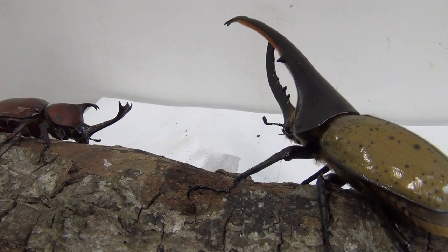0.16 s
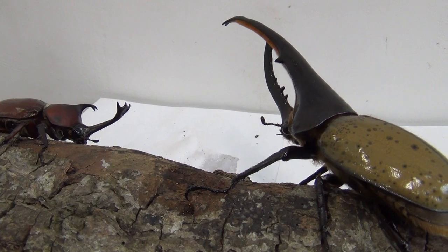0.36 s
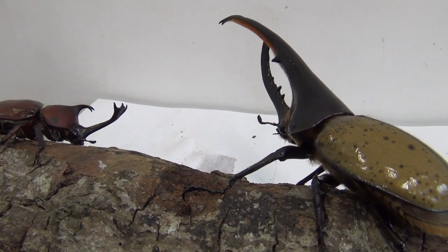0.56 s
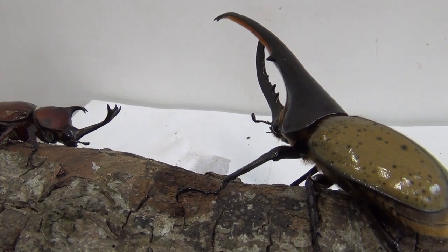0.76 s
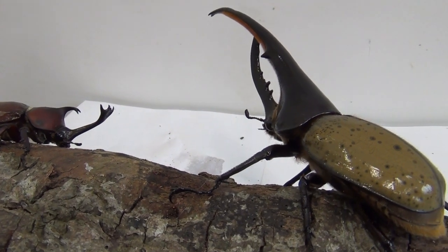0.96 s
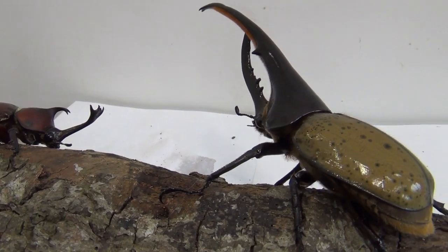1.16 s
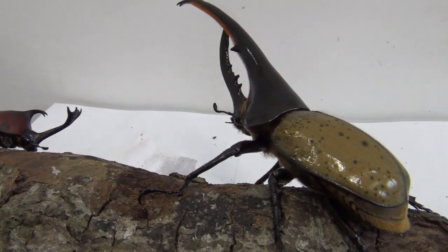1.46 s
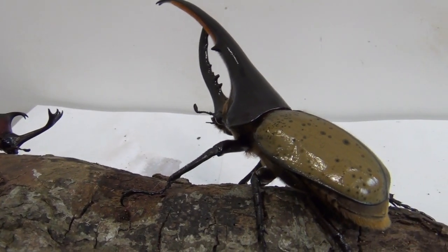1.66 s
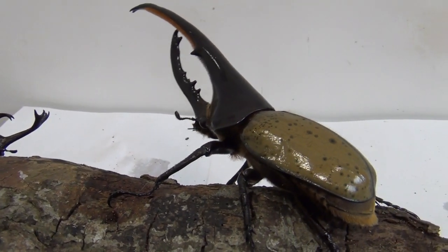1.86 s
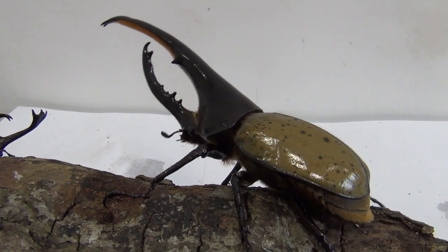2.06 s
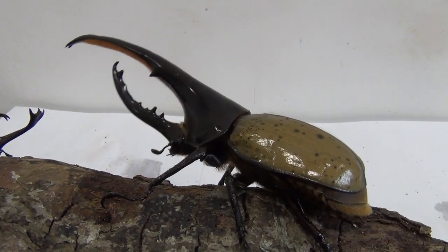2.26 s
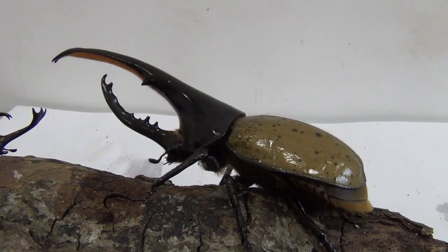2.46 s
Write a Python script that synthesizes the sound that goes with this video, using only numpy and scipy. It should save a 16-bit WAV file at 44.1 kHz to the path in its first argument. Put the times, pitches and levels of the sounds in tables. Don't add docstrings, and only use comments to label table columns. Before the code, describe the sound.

Large horned beetles creep on bark: sharp tiny clicks, woody taps and faint scrapes come in sparse clusters, the loudest before one second, close to a small stereo microphone in a quiet room with steady hiss.

```python
import sys
import numpy as np
from scipy import signal
from scipy.fft import rfft, irfft
from scipy.io import wavfile

SR = 44100
rng = np.random.default_rng(int(sys.argv[2]) if len(sys.argv) > 2 else 0)


def transcribe(u):
    v = np.clip(np.atleast_2d(u).T, -1, 1)
    q = np.round(v * 32767).astype(np.int16)
    wavfile.write(sys.argv[1], SR, q)


def gain_from_db(level_db):
    decades = np.asarray(level_db, float) / 20
    return 10 ** decades


N = 115542
TICK_SIDE_DB = -16.5


def rms_one(x):
    return x / np.sqrt(np.mean(x ** 2) + 1e-20)


def shape(x, points):
    point_hz, point_db = np.transpose(points)
    gain_db = np.interp(np.log(np.fft.rfftfreq(N, 1 / SR) + 1), np.log(point_hz), point_db)
    return irfft(rfft(x) * gain_from_db(gain_db), N)


def butter_filter(x, hz, kind):
    return signal.sosfilt(signal.butter(2, hz, kind, fs=SR, output="sos"), x)


def ring(clicks, hz, t60):
    radius = gain_from_db(-60 / (t60 * SR))
    angle = 2 * np.pi * hz / SR
    return signal.lfilter([0, np.sin(angle)], [1, -2 * radius * np.cos(angle), radius ** 2], clicks + 1e-18)


def hiss():
    # hz [Hz], density_db [dB per Hz]
    common_hiss = [(25, -62), (60, -32), (200, -15.5), (400, -7), (800, -2), (1900, -4), (10100, -14.5),
                   (15800, -20.5)]
    # hz [Hz], density_db [dB per Hz]
    side_hiss = [(25, 3), (80, 3), (900, -2), (2500, -9), (4500, -16.5), (5800, -3), (9500, -10),
                 (15000, -20)]
    # hz [Hz], left_minus_right_db [dB]
    lean = [(60, -7), (300, 2), (600, 2.5), (1100, 0.2), (8000, -0.1)]
    flicker_db, flicker_per_s = .15, 8
    fan_hz, fan_width_hz = 862, 55
    white = rng.standard_normal((4, N))

    flicker = rms_one(shape(white[3], [(flicker_per_s, 0), (10 * flicker_per_s, -40), (SR / 2, -150)]))
    mid = gain_from_db(-52 + flicker_db * flicker) * rms_one(shape(white[0], common_hiss))
    fan_t60 = np.log(1000) / (np.pi * fan_width_hz)
    mid += gain_from_db(-69) * rms_one(ring(white[2], fan_hz, fan_t60))
    side = gain_from_db(-66) * rms_one(shape(white[1], side_hiss))

    whine_hz, whine_rms_db = 15625, -82
    whine = gain_from_db(whine_rms_db) * np.sqrt(2) * np.sin(2 * np.pi * whine_hz * np.arange(N) / SR)
    left = shape(mid, [(hz, db / 2) for hz, db in lean])
    right = shape(mid, [(hz, -db / 2) for hz, db in lean])
    return np.array([left + side, right - side]) + whine


def scrapes(t):
    # start_s [s], length_s [s], level_db [dB]
    strokes = [
        (.797, .03, -57),
        (1.4, .14, -60),
        (2.015, .035, -58),
        (2.055, .03, -59),
        (2.45, .05, -60),
    ]
    grains_per_s = 4500
    grains = (rng.random(N) < grains_per_s / SR) * rng.standard_normal(N)
    grit = rms_one(butter_filter(grains + 1e-18, [3200, 12500], "band"))
    swell = np.zeros(N)
    for start_s, length_s, level_db in strokes:
        progress = np.clip((t - start_s) / length_s, 0, 1)
        swell += gain_from_db(level_db) * np.sqrt(np.abs(np.sin(np.pi * progress)))
    return swell * grit


def squeak(t):
    start_s, length_s, pitch_hz = .7992, .012, 9820
    level_db, growth_db = -50.5, 2
    progress = (t - start_s) / length_s
    gate = np.clip(14 * np.minimum(progress, 1 - progress), 0, 1)
    held = gate * gain_from_db(level_db + growth_db * np.clip(progress, 0, 1))
    return held * np.sin(2 * np.pi * pitch_hz * t)


def drags():
    t = np.arange(N) / SR
    return (scrapes(t) + squeak(t)) * [[1], [gain_from_db(TICK_SIDE_DB)]]


def ticks(events, modes, crack_top_hz, count=4):
    start_s, peak_db, region_hz, fall_db, chatter_s = np.transpose(events)[:, :, None]
    n_events = len(events)
    chatter_loss_db, after_slip_db = 4, -9
    mode_scatter_db, mode_spread_s = 1.5, .00015

    def draw_sign(columns):
        return np.sign(rng.random((n_events, columns)) - .5)

    slip = np.arange(count)
    share = (slip + rng.random((n_events, count)) * (slip > 0)) / count
    at = np.clip(((start_s + share * chatter_s) * SR).astype(int), 0, N - 1)
    size = gain_from_db(peak_db - chatter_loss_db * share + after_slip_db * (share > 0)) * draw_sign(count)
    size = size * ((share == 0) | (chatter_s > 0))

    out = np.zeros((2, N))
    for k, (mode_hz, mode_db, t60) in enumerate(modes):
        octaves_away = np.abs(np.log2(mode_hz / region_hz))
        scatter_db = 2 * mode_scatter_db * (rng.random((n_events, 1)) - 1)
        blow = size * gain_from_db(mode_db - fall_db * octaves_away + scatter_db)
        delay = (rng.random((n_events, 1)) * mode_spread_s * SR).astype(int)
        late = np.minimum(at + delay, N - 1)
        clicks = np.zeros((2, N))
        np.add.at(clicks[0], late, blow)
        np.add.at(clicks[1], late, blow * gain_from_db(TICK_SIDE_DB) * draw_sign(1))
        out += (-1) ** k * ring(clicks, mode_hz, t60)

    crack_db, crack_s = -20, .0015
    strength = np.zeros(N)
    np.add.at(strength, at, np.abs(size) * gain_from_db(crack_db))
    decay = np.exp(-1 / (crack_s * SR))
    crack = signal.lfilter([1], [1, -decay], strength + 1e-18) * rng.standard_normal(N)
    out[0] += butter_filter(crack, [1500, crack_top_hz], "band")
    out[0] = butter_filter(out[0], 400, "high")
    return out


def snaps():
    # start_s [s], peak_db [dB], region_hz [Hz], fall_db [dB per octave], chatter_s [s]
    joint_snaps = [(.4484, -36, 9800, 45, 0), (.4497, -36, 5750, 35, 0), (.4575, -51, 5700, 25, .005),
                   (.744, -26, 5700, 60, 0), (.7437, -32, 11100, 45, .006), (.7442, -35, 9000, 45, .001),
                   (.7455, -33, 3740, 25, .005), (.8, -43, 5500, 16, .005), (.8075, -43, 6500, 5, 0),
                   (.8135, -49, 10000, 8, .002), (.82, -51, 7000, 5, .004), (1.02, -49, 6100, 20, .002),
                   (1.218, -50, 6100, 15, .003), (1.979, -48, 10900, 20, .002),
                   (2.026, -46, 12400, 25, .003), (2.0375, -44, 9300, 22, .0015),
                   (2.041, -49, 6500, 10, .003), (2.063, -47, 10400, 40, .002),
                   (2.0715, -43, 6150, 60, .003), (2.358, -49, 9700, 12, .002), (2.461, -51, 9500, 5, .003),
                   (2.6185, -45, 5000, 2, .001), (.7436, -44, 5000, 6, .001), (.7437, -35, 11100, 60, 0),
                   (.8078, -43, 9900, 20, 0), (.803, -46, 4700, 20, .003), (.8145, -45, 10400, 30, 0),
                   (.816, -48, 4400, 20, 0), (2.0262, -50, 7500, 4, 0), (2.043, -50, 5500, 8, .002),
                   (1.47, -51, 9000, 10, .004), (2.49, -51, 7000, 8, .003)]
    # mode_hz [Hz], mode_db [dB], t60 [s]
    shell_modes = [(3000, -5, .02), (3740, -1, .02), (4400, -4, .015), (5000, -4, .015), (5690, 0, .018),
                   (6150, -4, .015), (7000, -5, .015), (8050, -8, .01), (9000, -3, .01), (9700, -3, .01),
                   (10400, -5, .012), (11100, -3, .013), (12400, -8, .01)]
    return ticks(joint_snaps, shell_modes, crack_top_hz=14000)


def knocks():
    # start_s [s], peak_db [dB], region_hz [Hz], fall_db [dB per octave], chatter_s [s]
    claw_blows = [(.4518, -35, 1420, 50, .004), (.4605, -43, 1420, 30, .002), (.7344, -30, 2240, 17, 0),
                  (.7463, -41, 1000, 25, .004), (.808, -39, 550, 30, .004), (.8105, -40, 1150, 30, .004),
                  (1.142, -32, 1980, 35, 0), (1.26, -50, 2500, 5, .003), (1.979, -45, 4300, 14, .002),
                  (2.0245, -45, 3500, 9, .002), (2.063, -44, 3700, 16, .001), (2.071, -46, 3300, 14, .002),
                  (2.483, -49, 4500, 5, .002), (.4487, -41, 4000, 5, .002), (.7345, -36, 930, 50, 0),
                  (.7344, -35, 7000, 9, .001), (1.1417, -31, 4200, 14, 0), (1.1411, -41, 10400, 50, 0),
                  (1.1423, -39, 6000, 25, 0), (2.028, -43, 1700, 25, .003), (2.035, -44, 1600, 25, .003),
                  (2.0265, -49, 8000, 2, .002), (2.04, -48, 3500, 12, .004), (2.072, -50, 9000, 4, .002)]
    # mode_hz [Hz], mode_db [dB], t60 [s]
    bark_modes = [(550, -10, .05), (930, -1, .03), (1150, -9, .025), (1420, -5, .035), (1800, -4, .014),
                  (2240, 0, .017), (3000, -3, .012), (3700, -4, .008), (4400, -3, .008), (5400, -7, .009),
                  (6400, -4, .009), (7400, -6, .007), (9000, -7, .007), (10400, -9, .006)]
    return ticks(claw_blows, bark_modes, crack_top_hz=7000)


def scene():
    mid, side = knocks() + snaps() + drags()
    return np.array([mid + side, mid - side]) + hiss()


def top_cut(x):
    return signal.sosfilt(signal.butter(12, 16670, fs=SR, output="sos"), x)


def record(dry):
    low_pass = signal.ellip(12, .2, 60, 15720, fs=SR, output="sos")
    mix = signal.sosfilt(low_pass, dry)
    return top_cut(mix)


dry = scene()
out = record(dry)
transcribe(out)
```